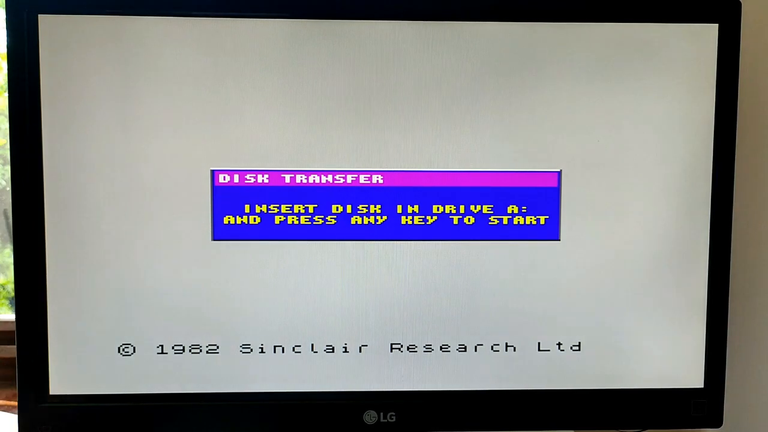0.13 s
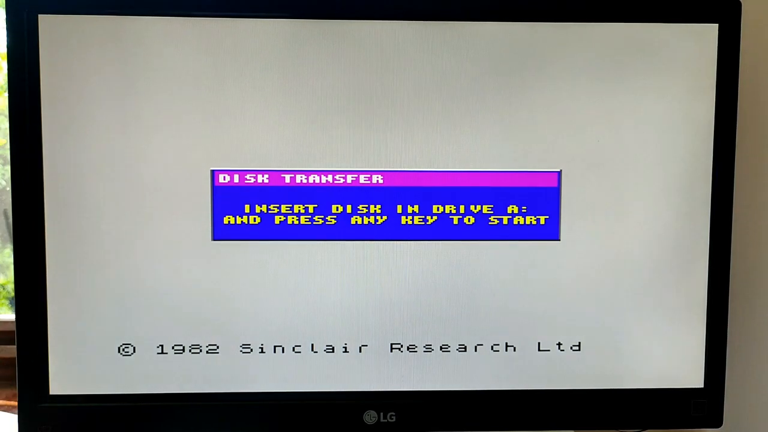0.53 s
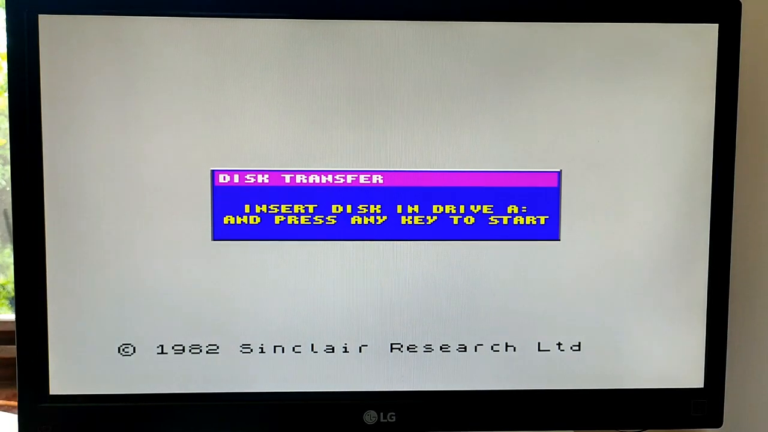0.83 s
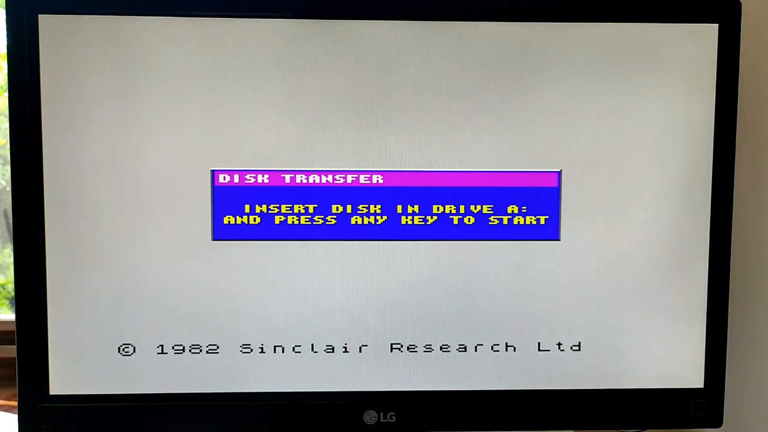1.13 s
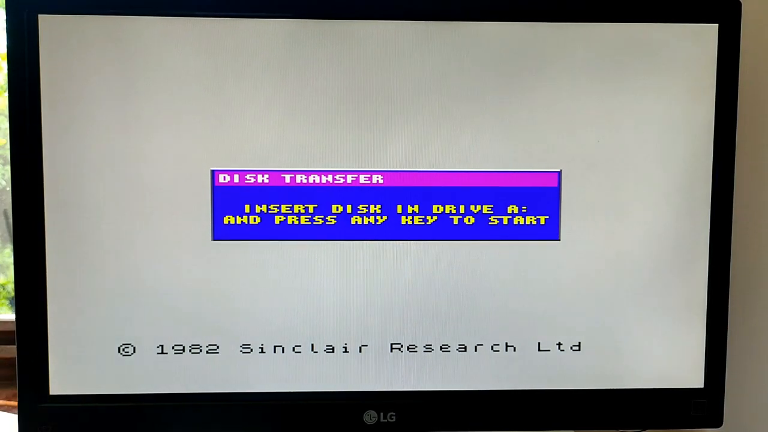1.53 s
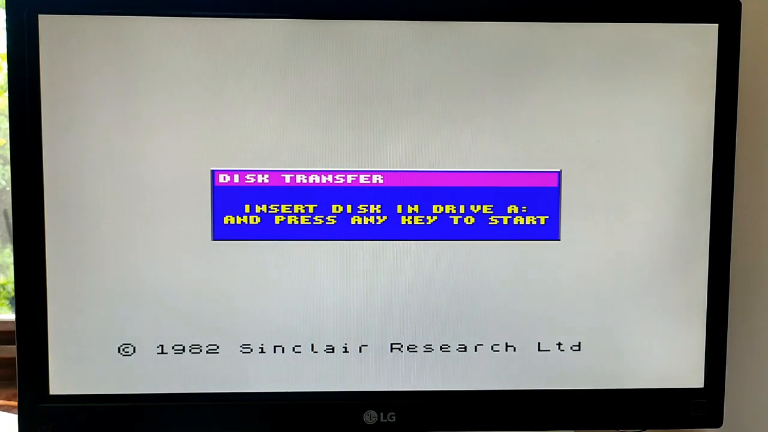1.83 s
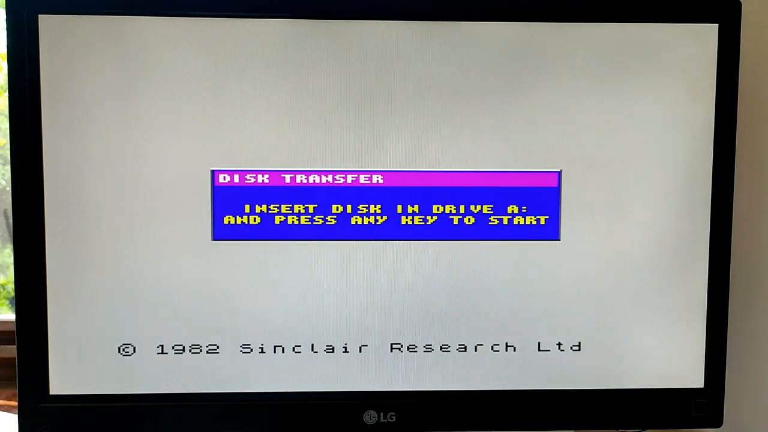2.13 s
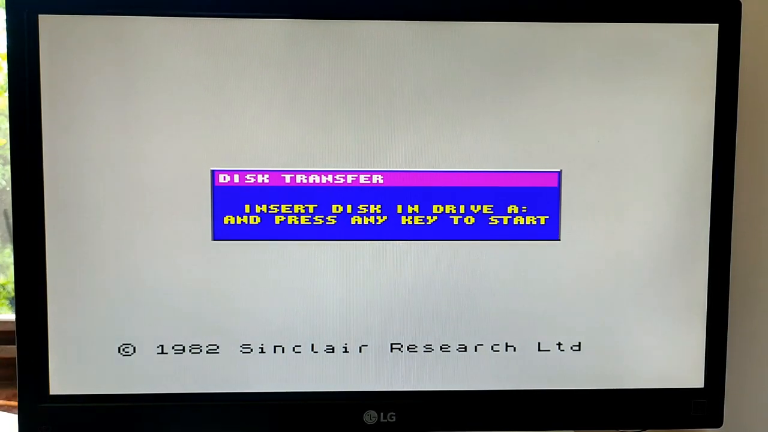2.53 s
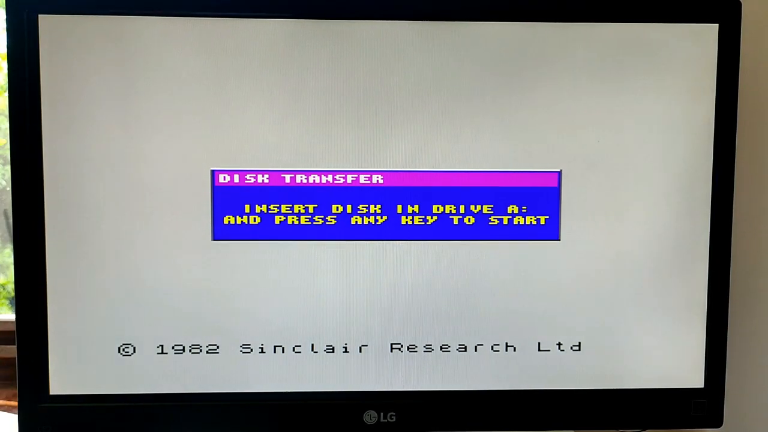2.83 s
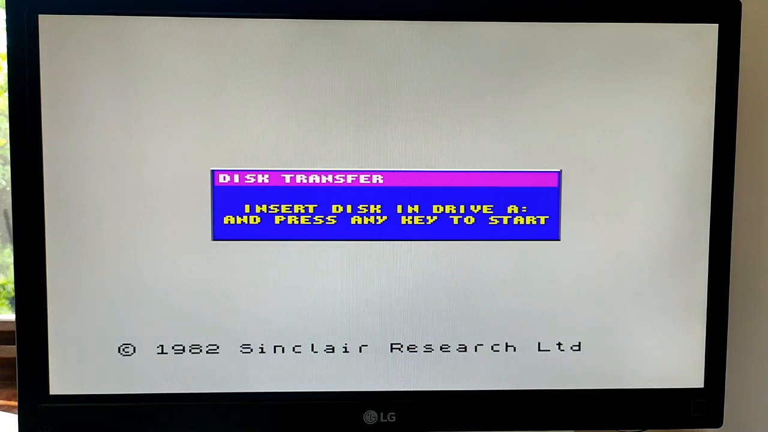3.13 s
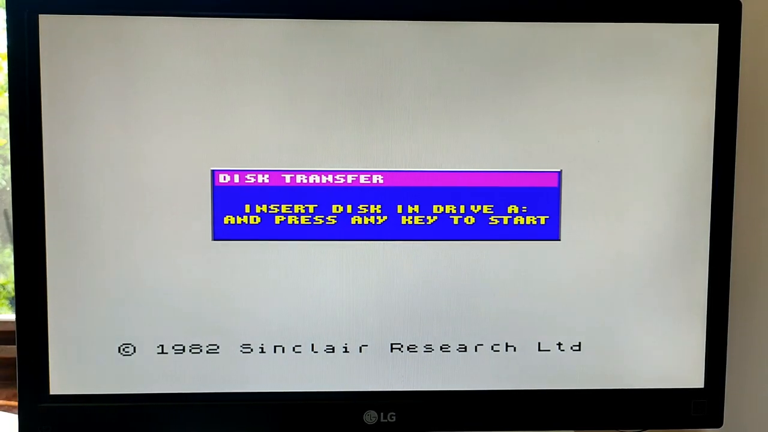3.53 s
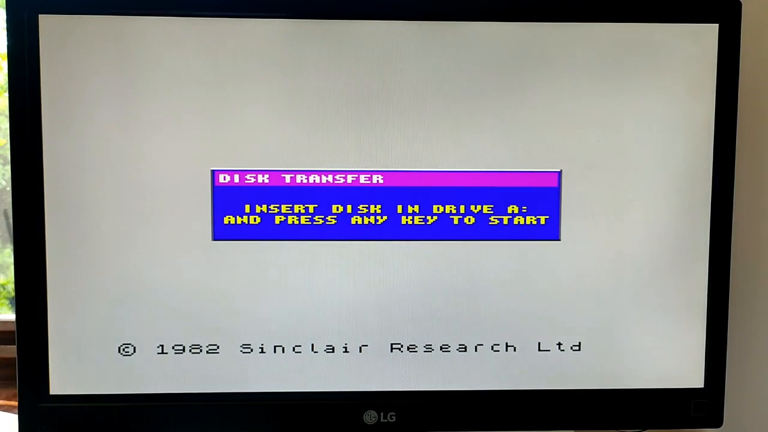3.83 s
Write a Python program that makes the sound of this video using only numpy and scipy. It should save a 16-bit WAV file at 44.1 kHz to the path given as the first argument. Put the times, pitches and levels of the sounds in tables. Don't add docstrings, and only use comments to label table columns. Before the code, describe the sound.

A plastic disk is handled close to the microphone: a quick flurry of clacks and slides, sparse taps, then harder snaps and one loud final knock, over constant quiet fan hum in a small room.

```python
import sys
import numpy as np
from scipy import signal
from scipy.fft import rfft, irfft, next_fast_len
from scipy.io import wavfile
from scipy.ndimage import uniform_filter1d, minimum_filter1d, map_coordinates

SR = 44100
rng = np.random.default_rng(int(sys.argv[2]) if len(sys.argv) > 2 else 0)


def inscribe(sig):
    pcm = np.round(np.clip(np.atleast_2d(sig).T, -1, 1) * 32767)
    wavfile.write(sys.argv[1], SR, pcm.astype(np.int16))


def gain_from_decibels(decibels):
    exponent = np.asarray(decibels, float) / 20
    return 10 ** exponent


N = 176400

# pitch in Hz, level in dB rms.
MOTOR_TONES = [(161.5, -70.5), (282.5, -61.5), (436.0, -65.5), (646.0, -66), (759.0, -69), (807.5, -73.5),
               (845.2, -67), (969.0, -82.5), (1130, -62)]
# pitch in Hz, level in dB rms.
COIL_TONES = [(1739, -78.5), (2514, -95.5), (2902, -70.5), (3731, -69.5), (4064, -83), (4430, -77.5),
              (4662, -81.5), (5130, -87.5), (5561, -82.5), (5959, -97.5), (6029, -78.5), (6062, -93.5),
              (6132, -82), (6347, -84.5)]
# frequency in Hz, density in dB per Hz.
AIR_COLOUR = [(40, -27), (150, 4.5), (220, -0.5), (300, -1.5), (1000, -4), (1400, -13), (3600, -12),
              (5000, -25.5)]
# centre in Hz, width in Hz, gain in dB.
CASE_NULLS = [(1310, 140, -2), (2357, 82, -18.5), (2694, 97, -18), (3800, 95, -3.5), (4250, 60, -4),
              (5200, 280, -0.5), (5040, 190, -10), (6180, 320, 8), (311, 25, 6)]
# frequency in Hz, time to fall 60 dB in seconds.
ROOM_DECAY = [(150, 0.61), (1000, 0.49), (4000, 0.35), (8000, 0.46)]
# pitch in Hz, width in Hz, level in dB.
DESK_MODES = [(294, 21, 4.5), (418, 174, -1.5), (511, 110, -2), (614, 42, 1), (800, 407, -3.5),
              (1114, 194, -1)]
# pitch in Hz, width in Hz, level in dB.
SHELL_MODES = [(1240, 332, 1), (1593, 397, 0.5), (1900, 340, 4), (2180, 830, -1), (3013, 190, 1),
               (3584, 430, -1.5), (3875, 630, -1.5), (4500, 770, -5)]
# pitch in Hz, width in Hz, level in dB.
SHUTTER_MODES = [(4830, 1200, -9), (5500, 470, -1.5), (5475, 1400, 0.5), (6720, 400, -4), (7070, 550, -6),
                 (7810, 740, -1)]
# pitch in Hz, level in dB, time to fall 60 dB in seconds.
DESK_TOP_MODES = [(116.7, -8.5, .25), (153.4, 4, 0.17), (58, -25.5, 0.14)]
# start in seconds, peak in dB.
PUSHES = [(0.155, -45.5), (0.316, -48), (0.602, -48.5), (1.488, -54.5), (1.981, -50.5), (2.751, -49.5),
          (2.909, -56), (1.842, -47), (1.38, -58), (3.142, -48.5), (3.382, -44), (3.552, -41), (3.94, -24)]
# middle in seconds, half length in seconds, shell level in dB rms,
# desk in dB over the shell, shutter in dB over the shell.
SLIDE_EVENTS = [(0.239, 0.035, -45, -4.5, -11), (0.294, 0.025, -39.5, 1, -6), (0.413, 0.03, -41, -4.5, -6),
                (0.434, 0.016, -37, -13, -5.5), (0.46, 0.027, -43, -3.5, -15.5),
                (0.497, 0.04, -47.5, 0, -3), (0.803, 0.17, -61.5, -5, -11),
                (1.294, 0.056, -72.5, 13.5, 4.5), (1.412, 0.065, -65, -4, 3.5),
                (1.838, 0.032, -53.5, 5.5, -9.5), (1.871, 0.061, -58, 2, 1), (1.95, 0.054, -54.5, 3.5, -10),
                (3.085, 0.048, -62, 2, 2.5), (3.151, 0.059, -59, 2, -4), (3.41, 0.025, -44.5, -2, 1),
                (3.454, 0.061, -54, -5, -4.5), (3.534, 0.033, -43, -10, 2), (3.604, 0.06, -63, 2, -17),
                (3.92, 0.015, -45.5, -1.5, -3.5), (3.941, 0.0062, -24, -6.5, -1),
                (3.966, 0.015, -46, 3.5, 15)]
# start in seconds, pitch in Hz, peak in dB.
SLIPS = [(0.1564, 3400, -38), (0.1593, 1260, -33), (.1648, 1010, -29), (0.2343, 2400, -25),
         (0.2444, 2500, -33), (0.263, 2300, -35), (0.293, 1900, -28), (0.3028, 2300, -27),
         (0.3142, 1300, -31), (0.3191, 1110, -31.5), (0.4112, 1700, -32), (0.4173, 1600, -28),
         (0.4238, 2850, -33), (0.427, 2600, -26), (0.434, 2190, -26), (.4378, 2800, -30),
         (0.4436, 1900, -35), (0.461, 2000, -31), (.504, 2200, -31), (.6015, 2840, -30),
         (1.4815, 3270, -36), (1.4905, 2950, -41), (1.837, 1100, -37), (1.9842, 3600, -36),
         (2.367, 2480, -46), (2.38, 1200, -54), (2.7615, 900, -46.5), (2.768, 700, -48),
         (2.9025, 2200, -45), (2.9082, 2060, -34), (2.9102, 1800, -39), (3.3597, 3560, -33),
         (3.3869, 3040, -31), (3.404, 3800, -22), (3.5187, 3400, -29), (3.5525, 2800, -42),
         (3.558, 2320, -36), (3.571, 2220, -32), (3.9028, 2000, -38), (3.9398, 2360, -21.5),
         (3.9422, 2300, -16.5), (3.9428, 4500, -11), (3.9478, 3600, -23), (3.9533, 1100, -17.5),
         (3.9615, 4600, -26)]
# start in seconds, pitch in Hz, peak in dB, # time to fall 60 dB in
# seconds.
HOLLOW_KNOCKS = [(0.153, 520, -33.5, 0.14), (.1545, 1210, -24.5, 0.054), (0.23, 440, -37.5, 0.14),
                 (0.31, 310, -34.5, 0.12), (3.7, 270, -48, 0.31), (0.31, 1340, -31, 0.075),
                 (1.481, 3340, -41, 0.024), (1.837, 620, -39, 0.11), (1.4, 1200, -41, 0.067),
                 (1.813, 610, -40, 0.2), (1.827, 610, -39, 0.058), (1.862, 640, -41.5, 0.12),
                 (1.989, 350, -44, 0.093), (1.1, 1890, -52, 0.068), (2.5, 300, -40.5, 0.12),
                 (2.749, 302, -41, 0.098), (2.907, 2370, -38.5, 0.025), (2.907, 1670, -38, 0.024),
                 (2.915, 420, -49, .07), (.172, 990, -37.5, 0.074), (3.95, 151, -29, .4),
                 (3.938, 1080, -24.5, 0.049), (3.94, 2300, -20.5, 0.041)]
# start in seconds, shell peak in dB, desk in dB over the shell,
# shutter in dB over the shell, time to fall 60 dB in seconds.
CLACK_EVENTS = [(0.1531, -24.5, -1.5, -14, 0.23), (0.2157, -27.5, -3.5, -6.5, 0.11),
                (0.2321, -28, -11, -13, 0.28), (0.3121, -27.5, 0.5, -14, 0.22),
                (0.5972, -31.5, -5, -7.5, 0.25), (0.7507, -46, 1, -2.5, 0.25), (0.8016, -48, -2, -7, 0.7),
                (1.2145, -61, 4, 4.5, 0.43), (1.4808, -35, -6, -8.5, 0.19), (1.8358, -36, -1, -11, 0.13),
                (1.981, -42.5, -2.5, -5.5, 0.32), (2.367, -38, -1, -5, 0.32), (2.7494, -51.5, 2, -7, 0.11),
                (2.9073, -37, -5, -10.5, 0.32), (3.1174, -46, 2, -3.5, 0.26), (3.3581, -39, -7, -6, 0.62),
                (3.3792, -29, -7.5, -6.5, 0.29), (3.5084, -38, -27, -27, 0.21),
                (3.5495, -28.5, -12, -2.5, 0.074), (3.5525, -21.5, -12, -14.5, 0.16),
                (3.5688, -32.5, -4, -2.5, 0.13), (3.9025, -43, -6, -8, 0.18),
                (3.9392, -10.5, -28, -9, 0.12), (3.9463, -16, -23.5, 1, 0.054), (3.9523, -29.5, 0, 0, 0.39)]
# frequency in Hz, threshold in dB a bin.
GATE_SILL = [(1150, -105), (1400, -90.5), (2400, -88), (3200, -82), (4300, -79), (5300, -92.5),
             (6200, -90.5), (7200, -75.5)]
# frequency in Hz, gain in dB.
BAND_EDGE = [(7000, -1), (7600, -15), (8200, -24.5), (8600, -47.5), (9000, -66), (10500, -76),
             (11500, -120)]


def unit(x):
    return x / np.sqrt(np.mean(x ** 2) + 1e-20)


def along(points, hz):
    f, v = np.transpose(points)
    return np.interp(np.log(hz + 1), np.log(f + 1), v)


def wobble(rate, order=3):
    knots = rng.standard_normal(int(N * rate / SR) + 4)
    return map_coordinates(knots, [np.arange(N) * rate / SR], order=order)


def smooth(field, rows, cols):
    return uniform_filter1d(uniform_filter1d(field, size=rows, axis=0), size=cols, axis=1)


def patches(shape, rows, cols):
    return unit(smooth(rng.standard_normal(shape), rows, cols))


def filtered(x, response):
    m = next_fast_len(len(x) + 2048)
    return irfft(rfft(x, m) * response(np.fft.rfftfreq(m, 1 / SR)), m)[:len(x)]


def bell(f, centre, width, db):
    return db * np.exp(-((f - centre) / width) ** 2)


def track(seconds):
    return np.zeros(N + SR), np.arange(int(SR * seconds)) / SR


def place(out, start, sound):
    out[round(start * SR):][:len(sound)] += sound


def tones(lines, blur, blur_hz):
    t = np.arange(N) / SR
    total = 0
    for hz, db in lines:
        skirt = wobble(blur_hz, order=1) + 1j * wobble(blur_hz, order=1)
        carrier = np.exp(2j * np.pi * (hz * t + rng.uniform()))
        total = total + np.sqrt(2) * gain_from_decibels(db) * np.real((1 + blur * skirt) * carrier)
    return total


def air():
    def colour(f):
        return gain_from_decibels(along(AIR_COLOUR, f) + sum(bell(f, *null) for null in CASE_NULLS))
    z = signal.stft(rng.standard_normal(N + 512), nperseg=512)[2]
    patch_db = 0.49 * patches(z.shape, rows=5, cols=20)
    noise = signal.istft(z * gain_from_decibels(patch_db), nperseg=512)[1][:N]
    swell_db = 0.6 * wobble(5.2)
    return gain_from_decibels(-55.5 + swell_db) * unit(filtered(noise, colour))


def fan():
    hum = tones(MOTOR_TONES[:-1], blur=0.5, blur_hz=40) + tones(MOTOR_TONES[-1:], blur=0.45, blur_hz=16)
    whine = tones(COIL_TONES[:8], blur=0.55, blur_hz=120) + tones(COIL_TONES[8:], blur=1.3, blur_hz=90)
    return air() + hum + whine


def room(x):
    hz, t, z = signal.stft(rng.standard_normal(SR // 2), SR, nperseg=256)
    fade = gain_from_decibels(-60 * t / along(ROOM_DECAY, hz)[:, None])
    tail = signal.istft(z * fade, SR, nperseg=256)[1]
    delayed = np.pad(x, (200, 0))
    return signal.fftconvolve(delayed, tail / np.linalg.norm(tail))[:N]


def thuds():
    out, t = track(1 / 3)
    for start, db in PUSHES:
        ring = 0
        for hz, mode_db, t60 in DESK_TOP_MODES:
            level_db = mode_db + rng.normal(0, 0.99) - 60 * t / t60
            ring = ring + gain_from_decibels(level_db) * np.sin(2 * np.pi * hz * t)
        place(out, start, gain_from_decibels(db) * ring * (1 - np.exp(-t / 0.018)))
    return out[:N]


def body(f, modes):
    scatter_db, shift = 1.2, 0.015
    total = 0
    for k, (hz, width, db) in enumerate(modes):
        c = hz * (1 + rng.normal(0, shift))
        strength = (-1) ** k * gain_from_decibels(db + rng.normal(0, scatter_db))
        total = total + strength * 1j * f * width / (c * c - f * f + 1j * f * width)
    return total / np.sqrt(np.mean(np.abs(total) ** 2))


def bodies(force, desk_db, shutter_db):
    def response(f):
        desk = gain_from_decibels(desk_db) * body(f, DESK_MODES)
        shutter = gain_from_decibels(shutter_db) * body(f, SHUTTER_MODES)
        return desk + body(f, SHELL_MODES) + shutter
    return filtered(force, response)


def chatter(size):
    grain_db, grains_per_s = 1.5, 1500
    grain = (np.arange(size) * grains_per_s / SR).astype(int)
    sizes = gain_from_decibels(grain_db * rng.standard_normal(size)[grain])
    return unit(rng.standard_normal(size) * sizes)


def slides():
    out, t = track(1 / 3)
    middle = 0.14
    for centre, half, db, desk_db, shutter_db in SLIDE_EVENTS:
        shape = np.exp(-((t - middle) / half) ** 2)
        rub = bodies(shape * chatter(len(t)), desk_db, shutter_db)
        place(out, centre - middle, gain_from_decibels(db) * rub)
    return out[:N]


def snaps():
    out, t = track(1 / 50)
    ring_cycles, overtone, overtone_db = 10.4, 2.8, -13.5
    for start, hz, db in SLIPS:
        ping = np.sin(2 * np.pi * hz * t) + gain_from_decibels(overtone_db) * np.sin(2 * np.pi * overtone * hz * t)
        place(out, start, gain_from_decibels(db - 60 * t * hz / ring_cycles) * ping)
    return out[:N]


def knocks():
    out, t = track(1 / 4)
    pair_ratio, pair_share = 1.05, 0.35
    for start, hz, db, t60 in HOLLOW_KNOCKS:
        second = np.sin(2 * np.pi * (hz * pair_ratio * t + rng.uniform()))
        pair = np.sin(2 * np.pi * hz * t) + pair_share * second
        place(out, start, gain_from_decibels(db - 60 * t / t60) * pair * (1 - np.exp(-t / 0.001)))
    return out[:N]


def clacks():
    out, t = track(1 / 3)
    attack_s, crack_s, tick_s = 0.0024, 0.03, 0.003
    crack_db, tick_db, clack_db = 2, 9, -11
    for start, db, desk_db, shutter_db, t60 in CLACK_EVENTS:
        tick = gain_from_decibels(tick_db - 60 * t / tick_s) * rng.choice([-1, 1], len(t))
        decay = gain_from_decibels(-60 * t / t60) + gain_from_decibels(crack_db - 60 * t / crack_s)
        rattle = (1 - np.exp(-t / attack_s)) * decay * chatter(len(t))
        strike = bodies(rattle + tick, desk_db + 4.5, shutter_db + 5.5)
        place(out, start, gain_from_decibels(db + clack_db) * strike)
    return out[:N]


def scene():
    hands = thuds() + slides() + snaps() + knocks() + clacks()
    room_db = -10
    return (fan() + gain_from_decibels(room_db) * room(hands) + hands)[None]


def gate(x):
    depth_db, drift_db, slope, hold_s = 21, 3.2, 2.5, 0.07
    hz, t, z = signal.stft(x, SR, nperseg=512)
    power = np.abs(smooth(np.abs(z) ** 2, rows=2, cols=7))
    level_db = 10 * np.log10(power + 1e-20)
    hold = int(hold_s / t[1]) | 1
    held_db = -minimum_filter1d(-level_db, size=hold, axis=1, origin=hold // 2)
    sill_db = along(GATE_SILL, hz)[:, None] + drift_db * patches(z.shape, rows=2, cols=30)
    opening = np.exp(np.clip(slope * (held_db - sill_db), -50, 50))
    gain_db = -depth_db / (1.5 + opening)
    return signal.istft(z * gain_from_decibels(gain_db), SR, nperseg=512)[1][:N]


def roll_off(x):
    return signal.sosfilt(signal.butter(12, 8630, fs=SR, output="sos"), x)


def record(dry):
    ported = filtered(dry[0], lambda f: gain_from_decibels(bell(f, centre=6670, width=700, db=4)))
    limited = filtered(gate(ported), lambda f: gain_from_decibels(along(BAND_EDGE, f)))
    converter_noise = gain_from_decibels(-96) * rng.standard_normal(N)
    mix = limited + converter_noise
    return roll_off(mix[None])


dry = scene()
out = record(dry)
inscribe(out)
```